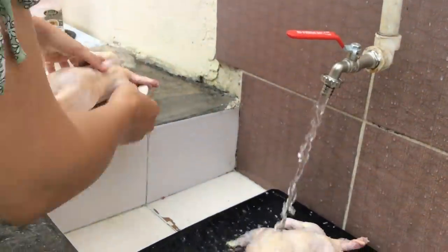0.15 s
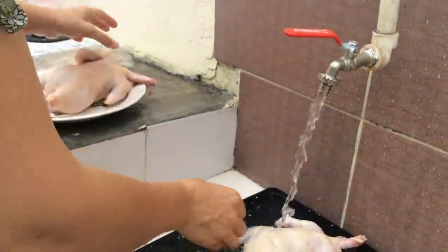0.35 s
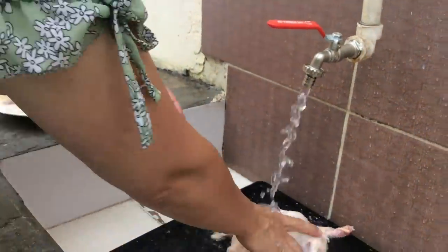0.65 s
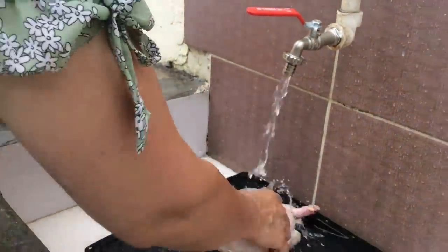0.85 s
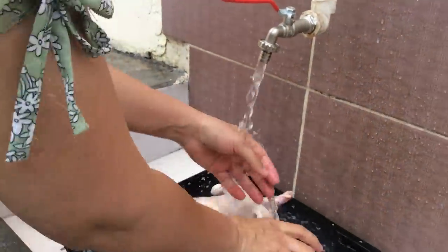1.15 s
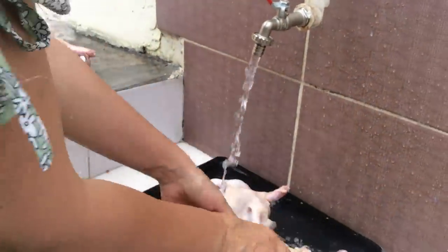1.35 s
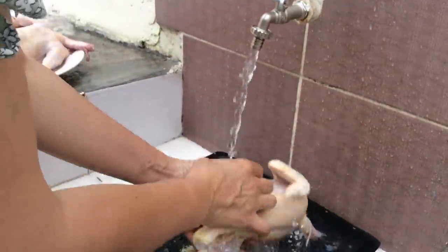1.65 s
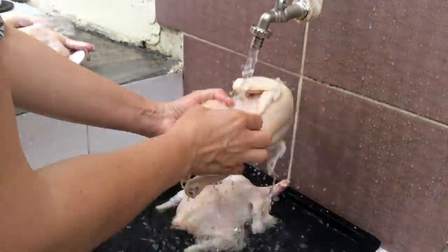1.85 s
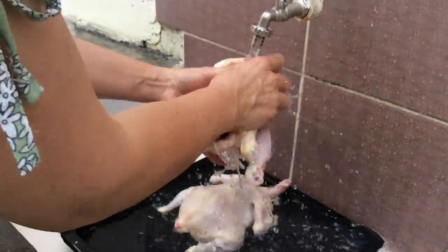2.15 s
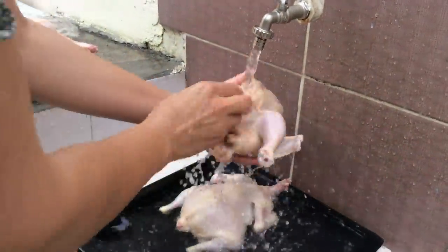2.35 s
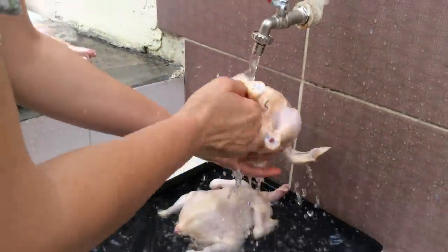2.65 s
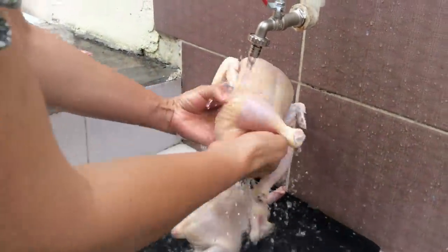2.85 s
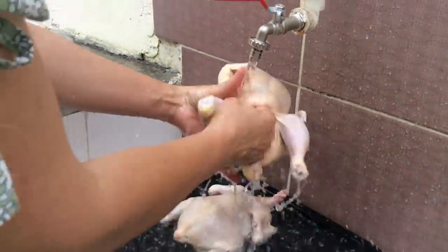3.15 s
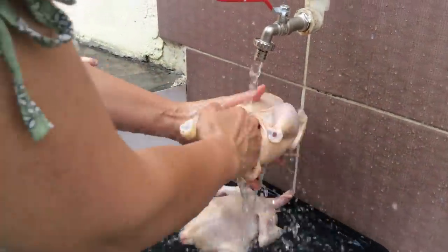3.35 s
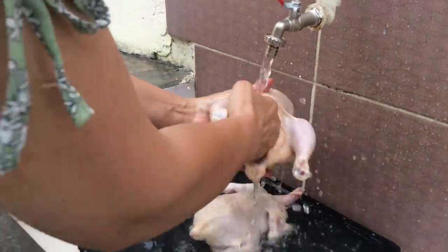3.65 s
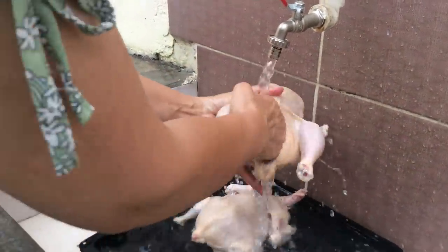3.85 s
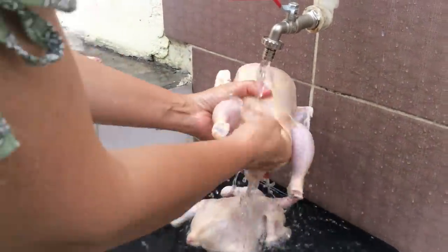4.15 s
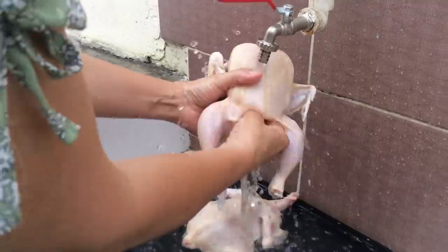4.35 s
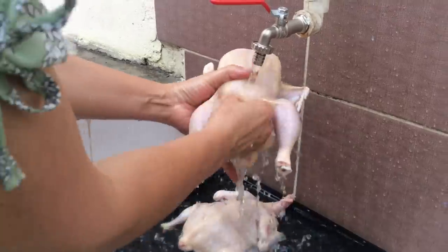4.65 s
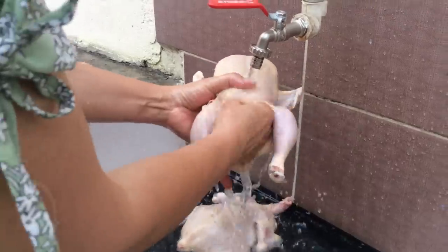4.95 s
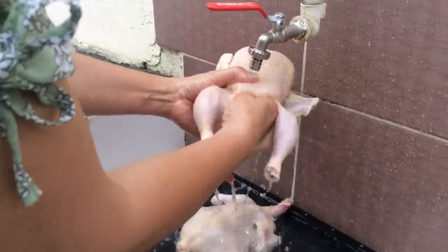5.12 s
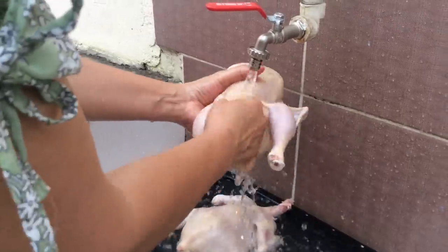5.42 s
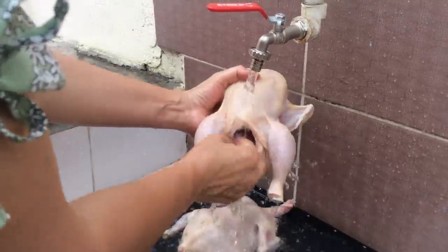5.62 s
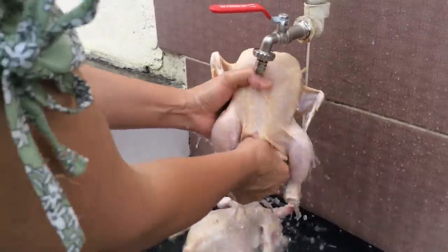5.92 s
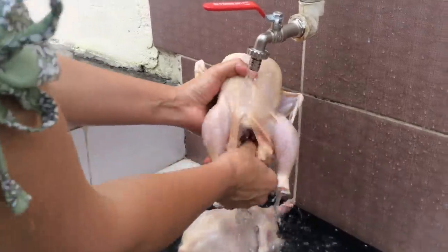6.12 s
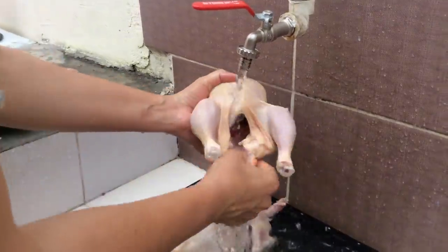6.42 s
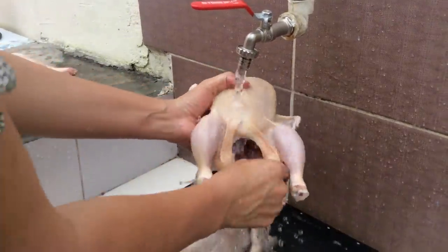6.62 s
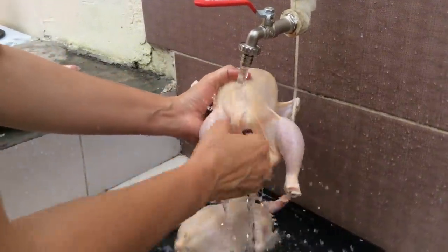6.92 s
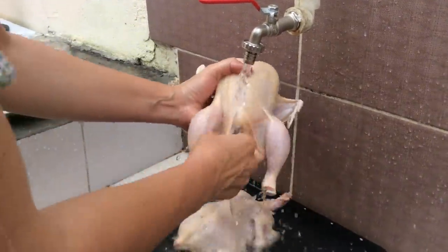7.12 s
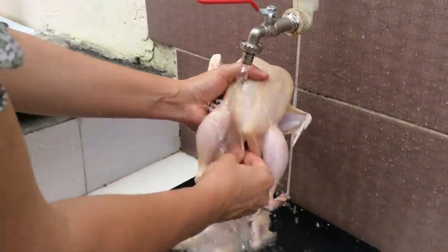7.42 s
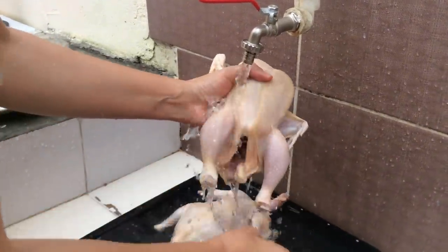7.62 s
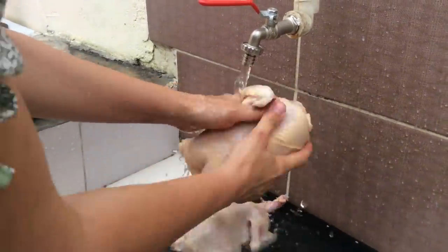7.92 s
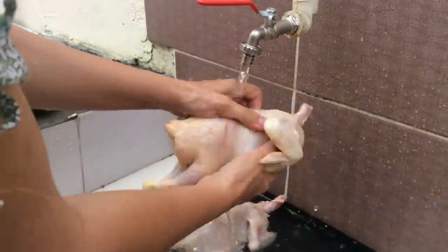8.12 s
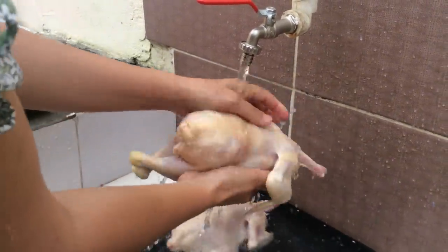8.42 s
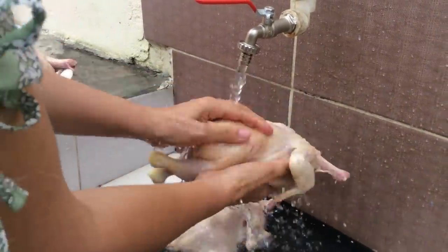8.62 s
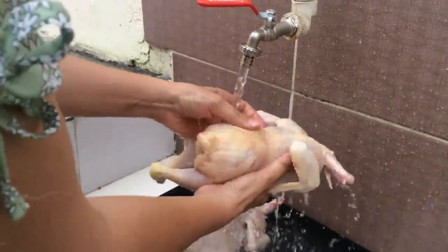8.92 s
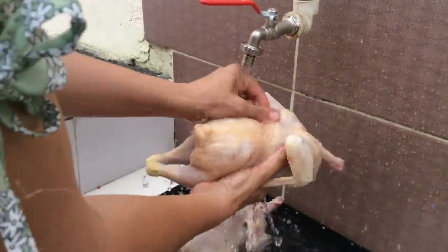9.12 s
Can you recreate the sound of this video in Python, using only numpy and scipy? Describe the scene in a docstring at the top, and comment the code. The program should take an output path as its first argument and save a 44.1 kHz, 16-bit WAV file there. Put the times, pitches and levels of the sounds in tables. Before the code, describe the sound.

A steady, bright stream of water spatters on meat and tray with wet splats and gliding bubble gulps, stopping suddenly at the end.

```python
"""Tap water runs over poultry being rinsed by hand above a tray, near the microphone in a tiled yard corner.
Flickering noise makes the spray and short noise bursts the splats; gliding sines are trapped bubbles.
Resonated noise drums on the tray and wakes the carcass hollow, with thuds on the tray; behind lie
a dull yard rumble and a low hum. The water is cut off near the end, then the quiet yard is heard alone."""
import sys
import numpy as np
from scipy import signal
from scipy.io import wavfile

SR = 44100
rng = np.random.default_rng(int(sys.argv[2]) if len(sys.argv) > 2 else 0)


def inscribe(sig):
    """Save sig as 16-bit PCM at rate SR to the path in sys.argv[1].

    A 1-D sig is mono; a 2-D sig holds one channel per row.
    Samples are clipped to [-1, 1] before scaling.
    """
    pcm = np.round(np.clip(np.atleast_2d(sig).T, -1, 1) * 32767)
    wavfile.write(sys.argv[1], SR, pcm.astype(np.int16))


N = 408807
CUT_S, RETURN_S = 9.2003, 9.249   # the water is cut; the yard is heard alone
TRAY_HZ = 204


def from_db(db):
    """Decibels to amplitude."""
    return 10 ** (np.asarray(db) / 20)


def rms_one(x):
    """Scales a sound to rms 1."""
    return x / np.sqrt(np.mean(x ** 2) + 1e-20)


def in_time(rows):
    """Joins the rows of a table by straight lines, one curve for each column after the time."""
    s, *columns = np.transpose(rows)
    return [np.interp(np.arange(N) / SR, s, c) for c in columns]


def drift(rate_hz):
    """Slow chance: noise through a double one-pole low-pass, run at every 40th sample; spread 1."""
    r = np.exp(-80 * np.pi * rate_hz / SR)
    noise = rng.standard_normal(N // 40 + 2002)
    slow = signal.lfilter([1], [1, -2 * r, r * r], noise)[2000:]   # drop the filter's start
    return np.interp(np.arange(N) / 40, np.arange(len(slow)), rms_one(slow))


def resonate(x, hz, width_hz):
    """One two-pole resonance."""
    r = np.exp(-np.pi * width_hz / SR)
    return signal.lfilter([1, 0, -1], [1, -2 * r * np.cos(2 * np.pi * hz / SR), r * r], x + 1e-18)


def churn(corner_hz):
    """The shaking of churning water: low-passed noise, rms 1."""
    lowpass = signal.butter(2, corner_hz, fs=SR, output="sos")
    return rms_one(signal.sosfilt(lowpass, rng.standard_normal(N)))


def add(out, s, sound):
    """Mixes a short sound in at time s."""
    i = max(round(s * SR), 0)
    out[i:i + len(sound)] += sound[:N - i]


def banded(spectrum, source, patchy_db, flicker_hz):
    """Third-octave bands of two unrelated sources, each band with its own level and flicker; rms 1."""
    hz_points, db_points = np.transpose(spectrum)
    out, edges = 0, np.geomspace(25, 16000, 29)
    for k, (low, high) in enumerate(zip(edges, edges[1:])):
        if hz_points[0] < high and low < hz_points[-1]:
            level_db = np.interp(np.log(low * high) / 2, np.log(hz_points), db_points)
            bandpass = signal.butter(2, [low, high], "band", fs=SR, output="sos")
            band = signal.sosfilt(bandpass, source[k % 2])
            out = out + band * from_db(level_db + patchy_db * drift(flicker_hz))
    return rms_one(out)


# the stream by the tray, gurgling more once hands and meat catch it: time_s, spray_db, gurgle_db
STREAM_LEVELS = [(0.0, -35, -58), (0.53, -34.5, -77), (0.83, -37.5, -63), (0.96, -35, -47),
                 (1.26, -28, -61), (1.64, -34.5, -40), (2.12, -37, -45.5), (2.58, -32, -47),
                 (3.06, -34, -44.5), (3.51, -34, -38), (4.12, -37, -41.5), (4.53, -32.5, -40.5),
                 (5.03, -32, -40), (5.21, -34.5, -40), (5.8, -31, -42), (6.3, -36.5, -40),
                 (6.7, -34, -37.5), (6.98, -29, -34.5), (8.04, -33.5, -47.5), (8.75, -32, -39.5),
                 (9.03, -36, -50.5), (9.08, -31.5, -69)]


def stream(pulse):
    """Running water: spray, chirping droplets and deeper gurgling, all following the slugs."""
    spray_db, gurgle_db = in_time(STREAM_LEVELS)
    spits = breakup(per_s=27, spread_db=5.5, t60=0.019, steady=0)   # single drops hitting hard
    droplets = gurgle(per_s=380, cycles=80.8, low_hz=2175, high_hz=10240, clumps=pulse, rough=0.67)
    gurgling = gurgle(per_s=190, cycles=53.2, low_hz=782.0, high_hz=3637, clumps=pulse, rough=0.45)
    droplets_db = (spray_db + gurgle_db) / 2 + 2.5
    water = from_db(spray_db) * spray(pulse + spits)
    water += from_db(droplets_db) * droplets
    return water + from_db(gurgle_db) * gurgling


def breakup(per_s, spread_db, t60, steady):
    """The stream arrives in random slugs that swell quickly and die away over a steady trickle."""
    sizes = from_db(spread_db * np.minimum(rng.exponential(1, N), 2.2))
    slugs = (rng.random(N) < per_s / SR) * sizes
    fall = from_db(-60 / (t60 * SR))
    swell = np.exp(-1 / (0.12 * t60 * SR))
    return steady + signal.lfilter([1 - swell], np.convolve([1, -fall], [1, -swell]), slugs)


# tone of the spray on skin and tray, a relative density per Hz: pitch_hz, level_db
SPRAY_TONE = [(710, -83), (1200, -5.5), (2630, 0), (3550, 3.5), (4070, 9.5), (7870, 5), (13000, 4.5),
              (15200, 4.5)]


def spray(pulse):
    """Thousands of droplets tick on skin and tray: uneven noise following the slugs."""
    sizes = from_db(3.3 * np.minimum(rng.exponential(1, (2, N)), 5))
    ticks = rng.standard_normal((2, N)) * sizes
    return banded(SPRAY_TONE, ticks * pulse, patchy_db=3.5, flicker_hz=26.4)


def gurgle(per_s, cycles, low_hz, high_hz, clumps, rough):
    """Small bubbles at random moments, sizes, lengths and pitches, louder inside the slugs."""
    out = np.zeros(N)
    draws = rng.random((4000, 5))
    starts = np.cumsum(-np.log(1 - draws[:, 0])) / per_s
    for s, (_, pitch, size, rise, life) in zip(starts[starts < CUT_S], draws):
        hz = low_hz * (high_hz / low_hz) ** pitch
        life_s = cycles * (0.22 + life) / hz
        strength = clumps[int(s * SR)] * from_db(7 * pitch - 5.94 * np.log(1.07 - size))
        bubble = chirp(hz, life_s, .5 * rise - .12, 2 * np.pi * life, swell=0.39)
        add(out, s, strength * bubble)
    # churning water shakes the bubbles, which blurs their tones
    return rms_one(out * (1 + rough * churn(low_hz / 3)))


def chirp(hz, life_s, rise, wobble, swell):
    """A bubble swells, rings unevenly while its pitch slides, and fades out by the end of its life."""
    t = np.arange(int(life_s * SR) + 2) / SR
    u = t / life_s
    shape = (1 - np.exp(-u / swell)) * from_db(-22 * u)
    shape *= np.cos(np.pi * np.minimum(u, 1) / 2) ** 2
    shape *= 1 + 0.23 * np.sin(11 * u + wobble)
    # the slide reaches the share "rise" of the pitch at the end
    phase = 2 * np.pi * hz * (t + rise * t * u / 2)
    return shape * np.sin(phase + .5 * np.sin(17 * u + wobble))


# the water thins out briefly: middle_s, depth_db, length_s
LULL_DIPS = [(0.744, 5.5, 0.034), (0.88, 11, 0.023), (0.95, 8.5, 0.034), (1.308, 10.5, 0.15),
             (1.987, 4.5, 0.052), (2.912, 7, 0.077), (3.146, 6.5, 0.14), (3.72, 5.5, 0.2),
             (5.342, 11, 0.13), (6.903, 12.5, 0.075), (7.31, 5.5, 0.2), (7.844, 12, 0.044),
             (8.011, 4.5, 0.035), (8.402, 10.5, 0.034)]


def thinning_db():
    """Each lull is a smooth dip in the flow."""
    t = np.arange(N) / SR
    return -sum(db * np.exp(-(2 * (t - s) / length) ** 2) for s, db, length in LULL_DIPS)


# slugs of water bursting, levels as nominal peaks: start_s, level_db, pitch_hz, decay_s
SPLAT_BURSTS = [(0.0201, 0, 2430, 0.013), (0.133, -7, 5700, 0.015), (0.242, -4.5, 7500, 0.011),
                (0.334, -30, 3900, 0.015), (0.498, -15.5, 3340, 0.016), (0.589, -10, 8100, 0.031),
                (0.855, -14.5, 2960, 0.024), (0.9092, -4.5, 8500, 0.0082), (0.9996, -0.5, 4470, 0.013),
                (1.05, -5.5, 2020, 0.02), (1.145, -7, 4650, 0.017), (1.3112, -11.5, 4300, 0.02),
                (1.3484, -11, 2770, 0.041), (1.4012, -11.5, 4900, 0.018), (1.45, -7.5, 2510, 0.029),
                (1.548, -4.5, 3800, 0.016), (1.711, -8.5, 1700, 0.051), (1.737, -3, 2970, 0.015),
                (1.8384, -4, 2000, 0.042), (2.0864, -7.5, 8350, 0.048), (2.293, -10, 3670, 0.015),
                (2.354, -3.5, 6060, 0.012), (2.381, -18, 4190, 0.044), (2.449, 3, 7800, 0.018),
                (2.4701, 4, 2100, 0.025), (2.582, -8, 2770, 0.019), (2.596, -9, 2780, 0.031),
                (2.61, 1, 3550, 0.0094), (2.645, -10, 2600, 0.034), (2.6832, -3.5, 5160, 0.038),
                (2.708, -9.5, 2770, 0.022), (2.723, -10.5, 2370, 0.037), (2.979, -2.5, 2530, 0.018),
                (3.1822, -6, 5650, 0.011), (3.303, -9.5, 4300, 0.071), (3.5696, -16, 4000, 0.075),
                (3.736, -12, 6050, 0.025), (4.1045, -11, 2400, 0.042), (4.123, -1, 2830, 0.032),
                (4.2234, -10, 3720, 0.069), (4.2697, -3.5, 5970, 0.016), (4.455, -4, 2800, 0.021),
                (4.641, -14, 2440, 0.015), (4.705, -3, 4300, 0.017), (4.735, -5, 3120, 0.034),
                (4.803, -15, 3000, 0.034), (4.874, -0.5, 2720, 0.015), (4.957, -10, 6400, 0.019),
                (5.2683, -12.5, 2750, 0.029), (5.375, -8.5, 3400, 0.038), (5.405, -6, 2420, 0.022),
                (5.439, -6.5, 2550, 0.02), (5.508, -8, 6260, 0.0082), (5.748, -8.5, 2460, 0.039),
                (5.991, -8, 4730, 0.015), (6.8636, -5.5, 4640, 0.015), (6.949, -8.5, 3600, 0.059),
                (7.013, -4.5, 2550, 0.066), (7.038, 5, 2640, 0.015), (7.546, -9, 5700, 0.015),
                (7.691, -9.5, 2980, 0.019), (7.891, -10.5, 2040, 0.026), (8.089, -5, 3300, 0.026),
                (8.295, -9.5, 3660, 0.016), (8.44, -9, 3900, 0.011), (8.471, -15, 4200, 0.01),
                (8.567, 4, 5800, 0.019), (8.591, -1.5, 6200, 0.017), (8.637, -10, 2300, 0.02),
                (8.839, -8, 5100, 0.011), (8.964, -15, 2780, 0.028), (8.98, -6.5, 2610, 0.017),
                (9.059, -8.5, 7550, 0.0063), (9.079, -14, 3550, 0.015), (9.104, -7.5, 4500, 0.015),
                (9.139, -15, 2060, 0.11), (9.177, -3, 2270, 0.016)]


def splats():
    """Each slug bursts into a short hiss: a rough ring at its centre inside a broad spit."""
    out, t = np.zeros(N), np.arange(3000) / SR
    bursts = rng.standard_normal((len(SPLAT_BURSTS), 3000))
    for (s, db, hz, decay_s), burst in zip(SPLAT_BURSTS, bursts):
        ring = rms_one(resonate(burst, hz, hz * 0.13))
        spit = rms_one(resonate(burst[::-1], hz * 1.32, hz * 3.2))
        u = t / max(decay_s, .006)
        crack = 0.5 * np.exp(-t / 0.00087)   # leads the hiss
        shape = (1 - np.exp(-t / 0.0006)) * (from_db(-25 * u - 10.0 * u * u) + crack)
        add(out, s, from_db(db - 14) * (ring + .55 * spit) * shape)   # 14 dB from peak to rms
    return out


# big trapped bubbles, levels nominal, lives of at least 8 cycles, glide as a share of the pitch:
# start_s, level_db, pitch_hz (at the start), life_cycles, glide_share
BIG_BUBBLES = [(0.001, -18.5, 784, 11, -0.022), (0.02, -15.5, 1060, 29, -0.51),
               (0.173, -32.5, 2490.0, 72, -0.04), (0.555, -28.5, 2680, 60, -0.2),
               (0.789, -24, 1630, 18, -0.6), (0.842, -22.5, 1390, 25, 0.05), (1.019, -15, 1970, 18, 0.62),
               (1.357, -16.5, 803, 34, 0.42), (1.419, -25.0, 1350.0, 35, -0.15),
               (1.661, -20.5, 1280, 58, -0.043), (1.692, -20.5, 761, 77, 0.5),
               (1.831, -22, 1325, 67, -0.16), (2.088, -15.5, 1350, 7.8, 0.38),
               (2.123, -18.5, 1760.0, 27, -0.11), (2.227, -17.5, 1900, 32, -0.014),
               (2.27, -23, 666, 42, -0.039), (2.293, -28.5, 900, 42, 0.77), (2.419, -22, 1350, 44, 0.55),
               (2.496, -18.5, 1410, 33, -0.092), (2.627, -27, 810, 24, 0.16),
               (2.686, -26.5, 860, 22, -0.19), (2.807, -20, 810.0, 47, 0.0051),
               (2.873, -15.0, 1220, 21, 0.16), (2.978, -16, 1263, 25, -0.051), (3.351, -25, 477, 27, 0.16),
               (3.468, -19, 2050, 40.0, -0.35), (3.645, -16, 1205, 25, -0.87),
               (3.817, -21.5, 1140, 28.0, 0.22), (3.817, -17, 570, 12.6, -0.037),
               (3.979, -24.5, 1670, 72, -0.2), (4.073, -22.5, 1410.0, 13, 0.14),
               (4.123, -19, 990, 46, -0.55), (4.283, -19, 1180, 35, 0.33), (4.357, -19.5, 1940, 39, 0.02),
               (4.734, -23.5, 1330, 30, -0.2), (4.898, -21.5, 1330, 31, -0.12), (5.369, -16, 3240.0, 35, 0),
               (5.431, -22.5, 1460.0, 27, -0.33), (5.653, -25, 1184, 42, 0.12),
               (6.006, -26, 864, 40, -0.081), (6.39, -18, 536, 27, 0.46), (6.518, -20, 692, 38, 0.12),
               (6.584, -21, 2050, 25, -0.4), (6.63, -21.5, 693, 30, 0.1), (6.72, -24, 2160, 67, -0.03),
               (6.823, -21.5, 1146, 34, 0.29), (6.869, -26, 1270.0, 34, 0.1),
               (7.046, -17.5, 707, 23, -0.083), (7.232, -21.5, 1470, 21, 0.2), (7.521, -17, 679, 39, -0.1),
               (7.695, -26.5, 1207, 60, 0.17), (7.749, -19.5, 2220, 56, 0.29), (7.965, -27.5, 940, 29, 0.2),
               (8.253, -16, 1790.0, 20.0, -0.13), (8.278, -19.5, 1610, 70, -0.12),
               (8.481, -20, 1330, 33, -0.15), (8.531, -21.5, 778, 44, 0.77), (8.594, -19, 1520, 24, 0.26),
               (8.832, -24, 1730, 130, -0.4), (9.017, -24.5, 850, 60, 0.34), (9.103, -23, 1013, 34, 0.27),
               (9.179, -22, 1393, 116, -0.29)]


def big_bubbles():
    """Each loud bubble glides up or down or holds its pitch, with the wet smack that traps it."""
    out, t = np.zeros(N), np.arange(2000) / SR
    smacks, wobbles = rng.standard_normal((len(BIG_BUBBLES), 2000)), rng.random(len(BIG_BUBBLES))
    for (s, db, hz, cycles, glide), smack, wobble in zip(BIG_BUBBLES, smacks, wobbles):
        life_s = max(cycles, 8) / hz
        bubble = chirp(hz, life_s, glide, 2 * np.pi * wobble, swell=0.066)
        add(out, s, from_db(db) * bubble)
        # a smaller neighbour breaks off just after
        neighbour = chirp(hz * (2.0 + 0.69 * wobble), 0.7 * life_s, glide, 0, swell=0.083)
        add(out, s + 0.22 * life_s, from_db(db - 16) * neighbour)
        puff = rms_one(resonate(resonate(smack, hz * 1.2, hz), hz * 1.2, hz))
        add(out, s, from_db(db - 11.5) * puff * from_db(-60 * t / life_s))
    return out * (1 + 0.2 * churn(220))   # churning water blurs the tones


# the carcass hollow faces the water: opens_s, shuts_s, level_db
HOLLOW_OPENINGS = [(2.604, 2.764, -47), (4.455, 4.54, -43.5), (5.504, 6.066, -45.5), (6.43, 6.78, -47),
                   (7.05, 7.285, -41.5)]


def hollow(pulse):
    """The heavier slugs knock on the air inside the carcass, which resonates while it faces the water."""
    hollow_hz, width_hz = 679, 69
    shut_db, turn_s = -84, 0.025
    t = np.arange(N) / SR
    opening = from_db(shut_db)
    for opens, shuts, db in HOLLOW_OPENINGS:
        facing = np.clip(np.minimum(t - opens, shuts - t) / turn_s + .5, 0, 1)
        opening = opening + from_db(db) * facing
    knocks = rng.standard_normal(N) * np.maximum(pulse - 0.8, 0) ** 0.88
    air = resonate(knocks, hollow_hz, width_hz)
    return opening * rms_one(resonate(air, hollow_hz, 3 * width_hz))


# runoff drumming on the tray, heaviest while the bird is first lifted: time_s, level_db
RUNOFF_LEVELS = [(1.5, -57), (2.6, -52.5), (4.6, -54.5), (6.2, -61)]


def drumming():
    """Runoff lands unevenly on the tray and makes it mutter."""
    lumps = breakup(per_s=26, spread_db=-3, t60=0.08, steady=0.095)
    blows = rng.standard_normal(N) * lumps
    tray = rms_one(resonate(resonate(blows, TRAY_HZ, 300), TRAY_HZ, 300))
    return from_db(in_time(RUNOFF_LEVELS)[0]) * tray


# heavy lumps of water and meat on the tray, levels nominal: start_s, level_db, pitch_hz
TRAY_THUDS = [(0.004, -24, 425), (0.029, -23, 204), (1.347, -26.5, 272), (1.602, -32, 476),
              (2.599, -38, 215), (2.942, -34.5, 325), (3.227, -32.5, 340), (3.302, -17.5, 502),
              (3.661, -30, 352), (4.197, -31, 466), (4.594, -29, 350), (5.365, -33.5, 255),
              (5.956, -26.5, 328)]


def thuds():
    """The tray booms briefly under the dull, rough ring of each lump."""
    out, t = np.zeros(N), np.arange(5000) / SR
    shape = (1 - np.exp(-t / 0.00054)) * from_db(-60 * t / 0.09)
    pushes = rng.standard_normal((len(TRAY_THUDS), 5000))
    for (s, db, hz), push in zip(TRAY_THUDS, pushes):
        tray = rms_one(resonate(resonate(push, TRAY_HZ, 250), TRAY_HZ, 280))
        rough = rms_one(resonate(push[::-1], hz * 1.4, hz * 4.0))
        body = np.sin(2 * np.pi * hz * t) + 0.73 * tray + .5 * rough
        add(out, s, from_db(db) * body * shape)
    return out


def tiles(x):
    """Two quick echoes from the hard surfaces of the tiled corner."""
    out = x.copy()
    for delay_s, db in [(.013, -17), (.022, -19)]:
        add(out, delay_s, from_db(db) * x)
    return out


# tone of the yard behind the water, a relative density per Hz: pitch_hz, level_db
YARD_TONE = [(25, -29), (70, -4), (86, -10.5), (220, -2.5), (295, -12.5), (388, 1.5), (484, -25.5),
             (528, -4.5), (1500, -22), (1950, -56)]


def yard():
    """Dull outdoor rumble of flickering noise bands, and a wavering hum of narrow resonated noise."""
    rumble = banded(YARD_TONE, rng.standard_normal((2, N)), patchy_db=7.0, flicker_hz=17.3)
    hum = rms_one(resonate(rng.standard_normal(N), 103.7, width_hz=11))
    return from_db(-53.5) * rumble + from_db(-58) * hum


def scene():
    """Water near the tiled wall over the yard's floor, then the yard alone."""
    pulse = breakup(per_s=48, spread_db=5.5, t60=0.025, steady=0.94)
    flow = (stream(pulse) + hollow(pulse) + drumming()) * from_db(thinning_db())
    water = flow + splats() + big_bubbles() + thuds()
    floor = yard()
    # the rinsing is cut off, leaving a faint remnant that dies within milliseconds
    t = np.arange(N) / SR
    after = np.clip(t - CUT_S, 0, 1)
    near = (tiles(water) + floor) * np.where(t < CUT_S, 1, from_db(-26 - 800 * after))
    # then the yard alone: its floor played backwards, with a little white hiss
    air = from_db(-63) * rng.standard_normal(N)
    return (near + (floor[::-1] + air) * (t > RETURN_S))[None]


def record(dry):
    """The microphone's top end falls away above about 15 kHz and is cut by 16.5 kHz."""
    mic = signal.sosfilt(signal.cheby2(10, 30, 15300, fs=SR, output="sos"), dry)
    return signal.sosfilt(signal.cheby2(12, 70, 16500, fs=SR, output="sos"), mic)


dry = scene()
out = record(dry)
inscribe(out)
```